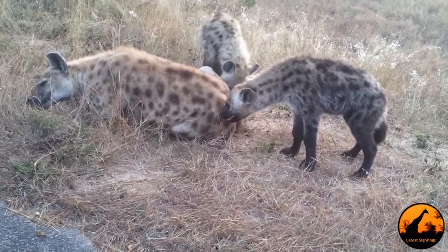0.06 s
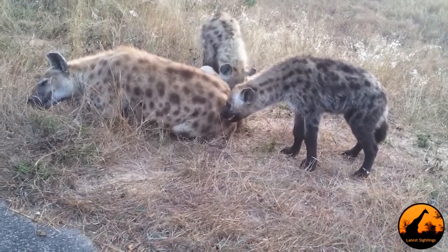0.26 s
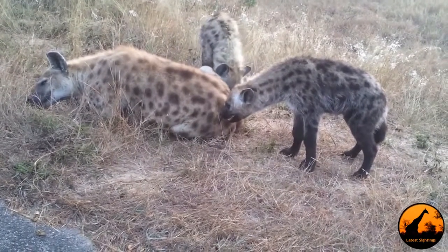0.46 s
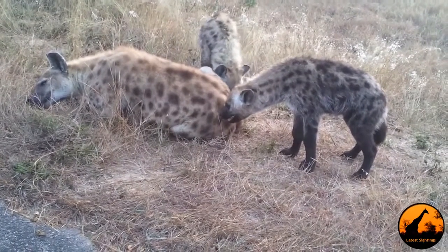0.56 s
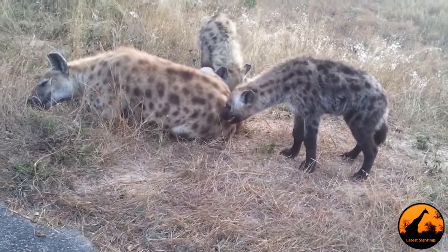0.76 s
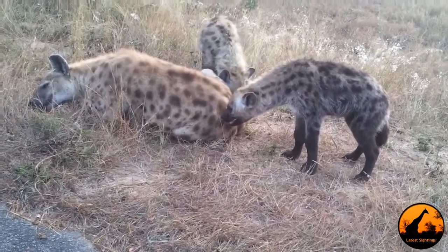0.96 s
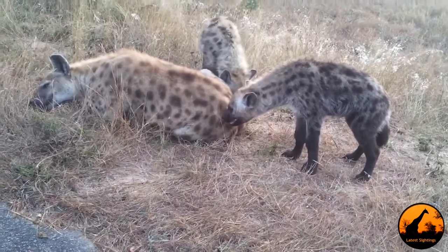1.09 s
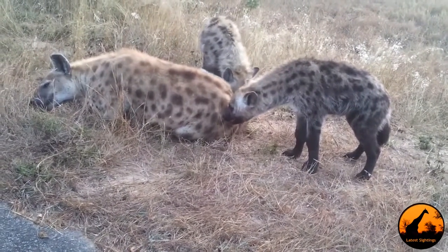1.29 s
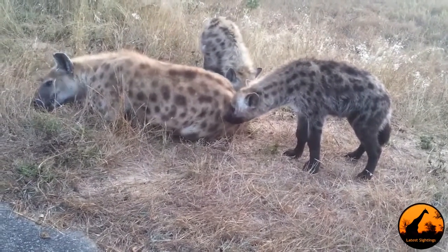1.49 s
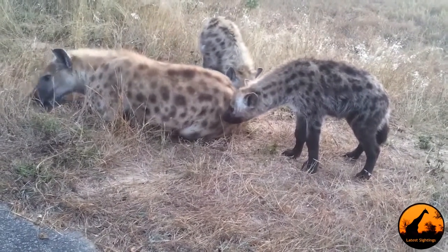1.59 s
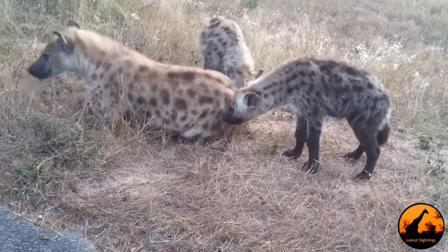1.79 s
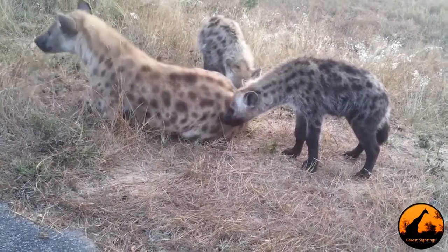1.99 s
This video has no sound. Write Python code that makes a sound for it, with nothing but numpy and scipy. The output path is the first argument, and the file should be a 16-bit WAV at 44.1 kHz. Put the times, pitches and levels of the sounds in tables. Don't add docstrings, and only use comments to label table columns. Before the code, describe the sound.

A young hyena squeals once, close and loud. A brief weak sound at 0 s dips, then a hoarse catch climbs from 0.1 s into a clear, nasal, overtone-rich cry, highest near 0.45 s, slowly sagging until 1.3 s, then dropping, croaking and stopping by 1.48 s. Faint outdoor echo follows. A distant bird chips and whistles thinly around 1.8-2 s. Light breeze and hiss throughout; the loudest peaks clip.

```python
import sys
import numpy as np
from scipy import signal
from scipy.fft import rfft, irfft, next_fast_len
from scipy.io import wavfile
from scipy.ndimage import uniform_filter1d, map_coordinates

SR = 44100
rng = np.random.default_rng(int(sys.argv[2]) if len(sys.argv) > 2 else 0)


def elevation(decibels):
    levels = np.asarray(decibels, float)
    return 10 ** (levels / 20)


def transcribe(u):
    v = np.clip(np.atleast_2d(u).T, -1, 1)
    q = np.round(v * 32767).astype(np.int16)
    wavfile.write(sys.argv[1], SR, q)


N = 90404
TOP_HZ = 15550


def unit(x):
    return x / np.sqrt(np.mean(x ** 2) + 1e-20)


def along(points, hz):
    f, v = np.transpose(points)
    return np.interp(np.log(hz + 1), np.log(f + 1), v)


def wobble(rate):
    return map_coordinates(rng.standard_normal(4000), [np.arange(N) * rate / SR])


def filtered(x, response):
    m = next_fast_len(N + SR // 2)
    hz = np.fft.rfftfreq(m, 1 / SR)
    return irfft(rfft(x, m) * response(hz), m)[..., :N]


def air():
    # (frequency [Hz], level [dB per Hz])
    air_colour = [(25, 1.5), (60, 1), (300, -2), (1200, -6.5), (3000, -9), (10000, -13.5), (14300, -18.5),
                  (15400, -45.5)]
    # (frequency [Hz], likeness [0 to 1])
    likeness = [(60, 0.29), (200, .12), (1600, .1), (5000, 0.0067)]
    air_db, patchy_db = -53, 1.2

    z = signal.stft(rng.standard_normal((2, N)), nperseg=512)[2]
    patches = uniform_filter1d(rng.standard_normal(z.shape[1:]), 6, 0)
    patches = uniform_filter1d(patches, 14, 1)
    pair = signal.istft(z * elevation(patchy_db * unit(patches)), nperseg=512)[1][:, :N]

    def colour(hz):
        angle = np.arccos(np.clip(along(likeness, hz), -1, 1)) / 2
        return elevation(along(air_colour, hz)) * np.array([np.cos(angle), np.sin(angle)])

    shared, opposed = filtered(pair, colour)
    return elevation(air_db) * unit(np.array([shared + opposed, shared - opposed]))


def tail(x, decay, delay_s):
    hz, t, z = signal.stft(rng.standard_normal((2, SR // 2)), SR, nperseg=256)
    fade_db = -60 * t / along(decay, hz)[:, None]
    h = signal.istft(z * elevation(fade_db), SR, nperseg=256)[1]
    h = np.pad(h / np.linalg.norm(h[0]), ((0, 0), (round(delay_s * SR), 0)))
    return signal.fftconvolve(x, h, axes=1)[:, :N]


def bird():
    # (start [s], length [s], first pitch [Hz], last pitch [Hz], level [dB])
    bird_notes = [
        (1.787, .014, 3290, 3080, -53.5),
        (1.796, 0.0089, 2700, 2490, -58),
        (1.807, 0.17, 2540, 2494, -53),
        (1.835, 0.11, 3300, 3187, -64.5),
        (1.845, 0.135, 2950, 2880, -67),
        (1.898, 0.092, 1400, 1320, -75),
        (1.56, 0.21, 1456, 1430, -65.5),
    ]
    peak_at = 0.32
    t, song = np.arange(N) / SR, np.zeros((2, N))
    for start, length, from_hz, to_hz, db in bird_notes:
        u = np.clip((t - start) / length, 0, 1)
        swell = np.abs(np.sin(np.pi / 2 * np.interp(u, [0, peak_at, 1], [0, 1, 2])) ** .6)
        tone = np.sin(2 * np.pi * np.cumsum(from_hz + (to_hz - from_hz) * u) / SR)
        flutter_db = 1.46 * np.array([wobble(29.3), wobble(29.68)])
        song += elevation(db + 1.5 + flutter_db) * swell * tone
    return song


def lobes(table, f):
    s, b = 1j * f / 3850, 1j * f / 200
    low_cut = b * b / (b * b + 1.414 * b + 1)
    band = low_cut / ((s * s + .765 * s + 1) * (s * s + 1.848 * s + 1))
    pairs = [(z * z - f * f + 1j * f * v) / (c * c - f * f + 1j * f * w) for c, w, z, v in table]
    return band * np.prod(pairs, axis=0)


def hyena():
    # (time [s], pitch [Hz], effort [dB], hoarseness against the tone [dB],
    # brightness [dB per octave])
    cry_onset = [
        (0, 481, -23.5, -19.5, 0.5),
        (.02, 481.4, -41.5, -14, 1),
        (0.045, 436, -48.5, -20, 2),
        (0.076, 486.7, -43.5, -4.5, 1.5),
        (.105, 549.4, -36, -9.5, 3),
        (0.137, 577, -28.5, -17.5, -1.5),
        (0.148, 639, -23, -12.5, 1.5),
        (0.182, 693, -22.5, -18, 2),
        (0.222, 748.6, -18, -24, 1.5),
    ]
    cry_held = [
        (0.301, 797, -17, -33.5, .8),
        (0.392, 837, -14, -38, 1),
        (0.463, 851.4, -13, -26.5, 1),
        (.55, 835.2, -11.5, -27.5, 1),
        (0.648, 801.2, -14, -29, 0.59),
        (0.751, 786.8, -14, -25.5, 0.88),
        (0.972, 761.4, -13.4, -28, 1),
        (1.15, 721.9, -14, -25.5, 0.8),
        (1.3, 706.6, -13.5, -35, 0.68),
    ]
    cry_collapse = [
        (1.35, 684.2, -13.5, -27, 0),
        (1.373, 648.4, -12.5, -23, 1),
        (1.401, 581, -19, -24, -3),
        (1.419, 524.5, -22, -11.5, -4),
        (1.435, 460, -35.5, -8, -8),
        (1.443, 420.4, -24, -11, -11),
        (1.454, 394, -53, -8, -18.5),
        (1.474, 432, -67, -24, -22.5),
    ]
    # (peak [Hz], width [Hz], notch [Hz], notch width [Hz])
    left_path = [(659, 148, 690, 1190), (904.7, 77, 858, 286), (1112, 96, 810, 515), (1818, 200, 1184, 670),
                 (2380, 166, 1853, 60), (2950.0, 218, 2651, 92), (3909, 470, 3450, 170.0),
                 (4719, 240, 4300, 53), (5067, 1580, 4990, 40), (5987, 103, 5823, 163),
                 (6505, 343, 6327, 190), (6850, 650, 7113, 170), (7664, 240, 7818, 240),
                 (8097, 330, 8367, 47)]
    right_path = [(690, 250, 1000, 980), (923, 70.0, 807, 140.0), (1185, 61, 890, 1010),
                  (1737, 110, 1450, 240), (2149, 180, 1660, 87), (2884, 218, 2550, 500),
                  (4014, 140, 3582, 320.0), (5080, 61, 4650, 300), (5700, 140, 5268, 160.0),
                  (6510, 1150.0, 5520, 80.0), (6550, 820, 6310, 170.0), (7380, 2850, 7720, 200),
                  (8360, 400, 8450, 310.0), (9600, 1900, 10510, 710)]
    # (frequency [Hz], width [Hz], change when shut [dB])
    jaw_changes = [(4114, 320, -18.5), (4783, 200, 11), (2130, 200, 2), (3300, 250, 5.5), (1820, 160, -2)]
    jaw_from_s, jaw_shut_s, silent_s, glide_s = 0.87, 1.5, 1.485, 0.0072
    half_db, half_rate, shift_rad = -15.5, 130, 0.22
    breath_db, breath_hz = 10.5, 2980
    rasp_hz, rasp_width_hz, rasp_db = 5500, 3600, 10.5
    tilt_hz, soft_hz = 1500, 10740

    t = np.arange(N) / SR
    s, *columns = np.transpose(cry_onset + cry_held + cry_collapse)
    curves = [uniform_filter1d(np.interp(t, s, c), round(glide_s * SR)) for c in columns]
    pitch, effort_db, hoarse_db, bright_db = curves
    phase = 2 * np.pi * np.cumsum(pitch * (1 + .0013 * wobble(120))) / SR

    def uneven():
        halves = wobble(half_rate) * np.cos(phase / 2) + wobble(half_rate) * np.sin(phase / 2)
        return elevation(hoarse_db) * halves

    k = np.arange(1, 23)[:, None]
    overtone_hz = k * pitch
    shut = np.clip((t - jaw_from_s) / (jaw_shut_s - jaw_from_s), 0, 1)
    jaw_db = shut * sum(db * np.exp(-((overtone_hz - hz) / w) ** 2) for hz, w, db in jaw_changes)
    drift_db = 0.3976 * np.clip(k - 3, 1, 12) * np.array([wobble(9.23) for _ in k])
    gain = elevation(bright_db * np.log2(overtone_hz / tilt_hz) + jaw_db + drift_db)
    gain = gain * (overtone_hz < TOP_HZ) / (1 + (overtone_hz / soft_hz) ** 4)
    lean = 0.065 * k * k
    pulses = -np.sum(gain * np.cos(k * (phase + shift_rad * uneven()) + lean), axis=0)

    def breath_colour(f):
        rasp = elevation(rasp_db * np.exp(-((f - rasp_hz) / rasp_width_hz) ** 2))
        return f * f / (f * f + breath_hz ** 2) * rasp

    hiss = filtered(rng.standard_normal(N), breath_colour)
    puffs = elevation(breath_db + hoarse_db + bright_db) * (1 + np.cos(phase)) * hiss
    voice = pulses * (1 + elevation(half_db) * uneven()) + puffs
    voice = voice * elevation(effort_db - 0.5) * np.clip((silent_s - t) / 0.014, 0, 1)
    return filtered(voice, lambda f: np.array([lobes(left_path, f), lobes(right_path, f)]))


def scene():
    # (frequency [Hz], time to fade by 60 dB [s])
    bush_decay = [(400, .6), (2500, .8), (9000, .35)]
    near_decay = [(400, .08), (2500, .05), (9000, .04)]
    bush_delay_s = .012
    cry, song = hyena(), bird()
    near_echo = elevation(-30) * tail(cry, near_decay, 0.0036)
    bush_echo = elevation(-36) * tail(cry, bush_decay, bush_delay_s)
    song_echo = elevation(-9) * tail(song, bush_decay, bush_delay_s)
    return cry + near_echo + bush_echo + song + song_echo + air()


def roll_off(x):
    return signal.sosfilt(signal.butter(12, 15530, fs=SR, output="sos"), x)


def record(dry):
    hardness = 14
    clipped = dry / (1 + np.abs(dry) ** hardness) ** (1 / hardness)
    mix = filtered(clipped, lambda hz: (hz < TOP_HZ) * elevation(-16 * (hz > 14600)))
    return roll_off(mix)


dry = scene()
out = record(dry)
transcribe(out)
```